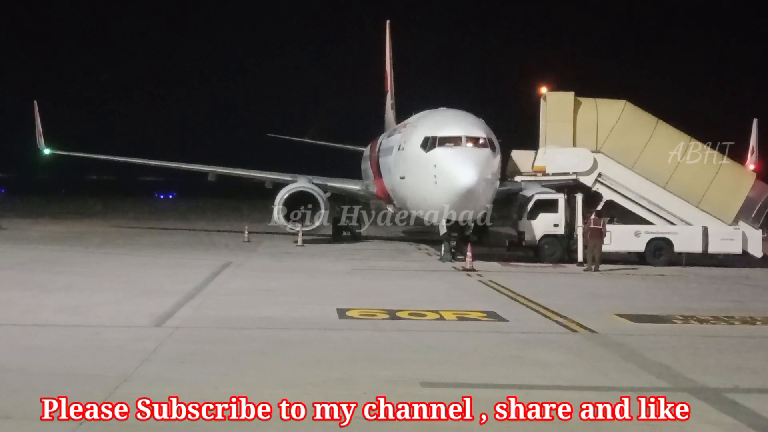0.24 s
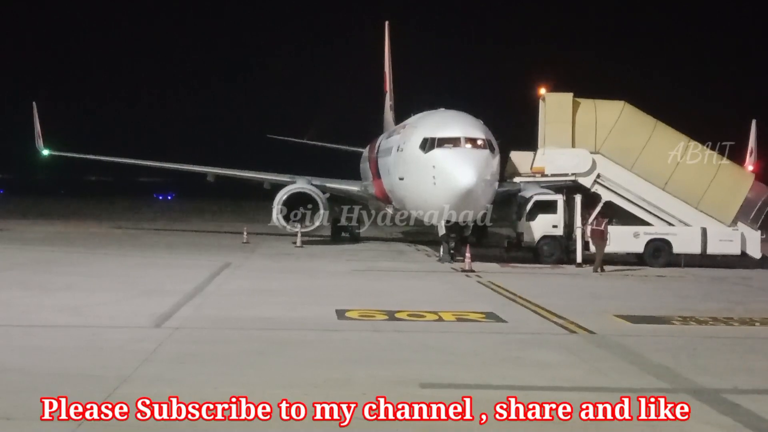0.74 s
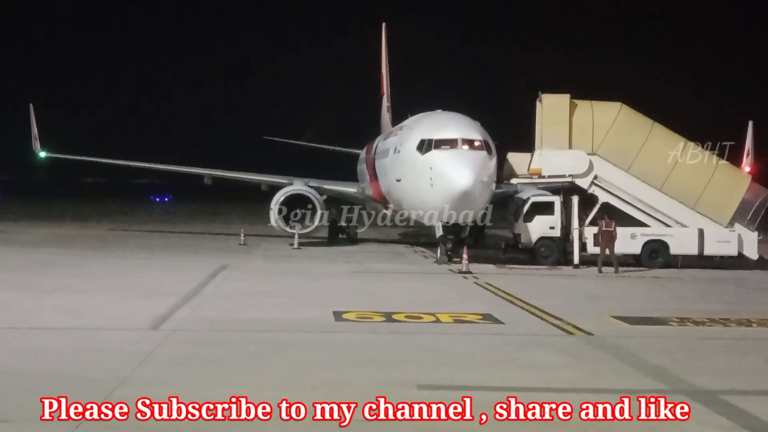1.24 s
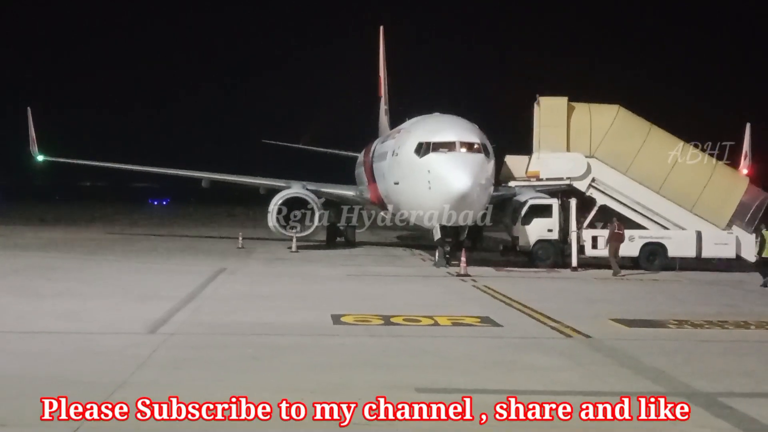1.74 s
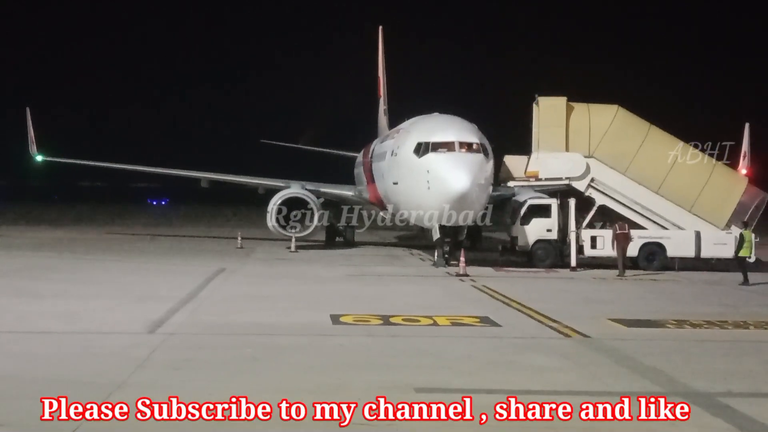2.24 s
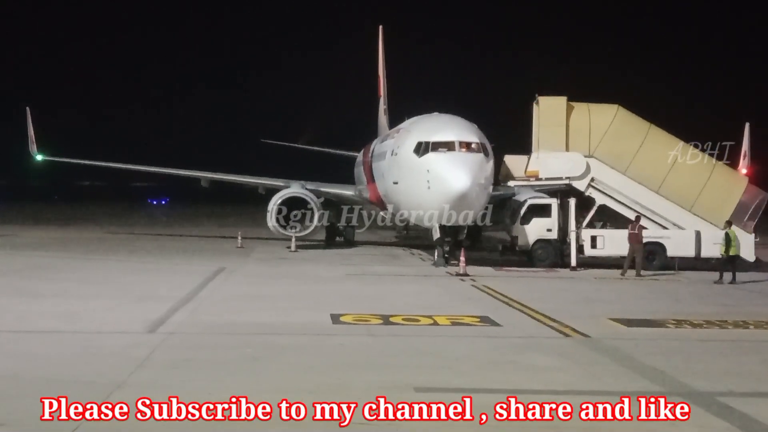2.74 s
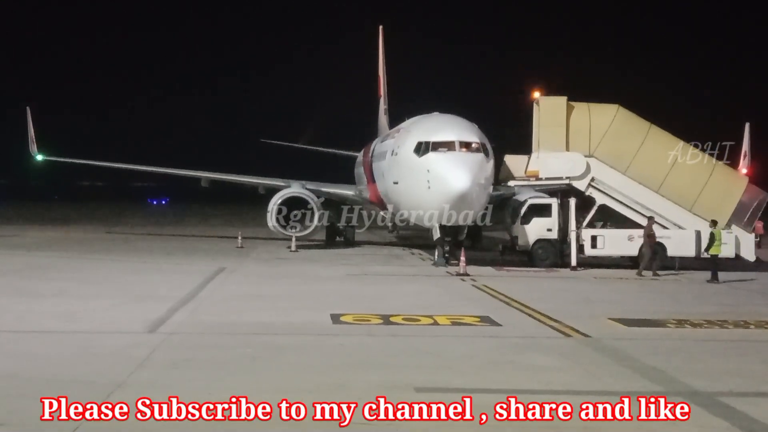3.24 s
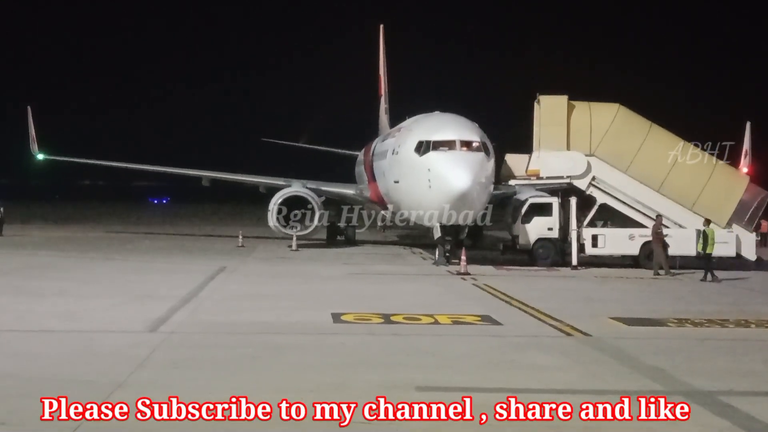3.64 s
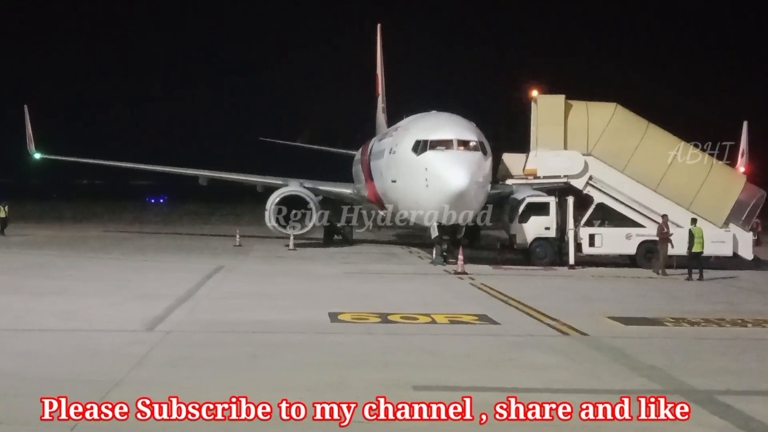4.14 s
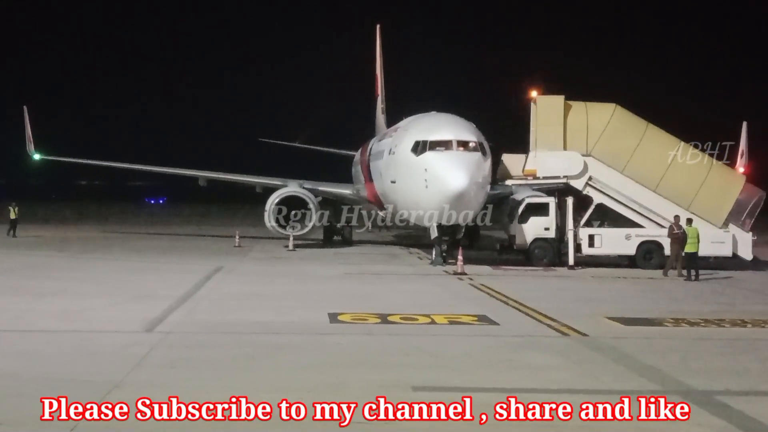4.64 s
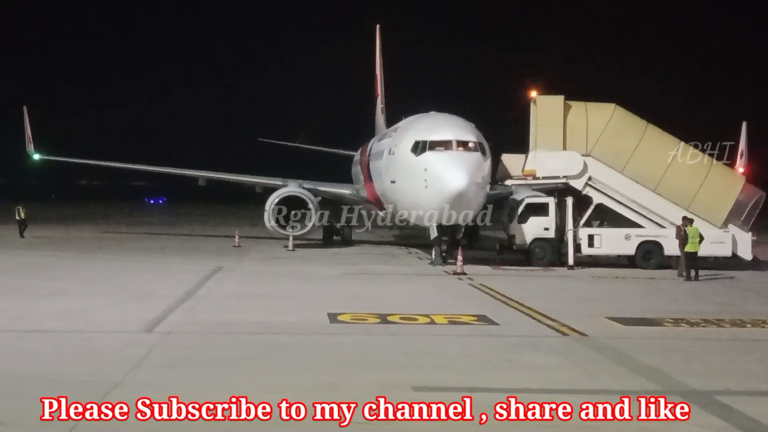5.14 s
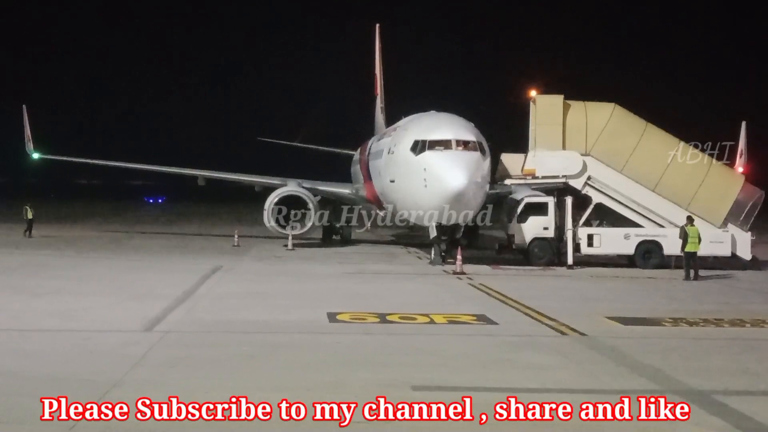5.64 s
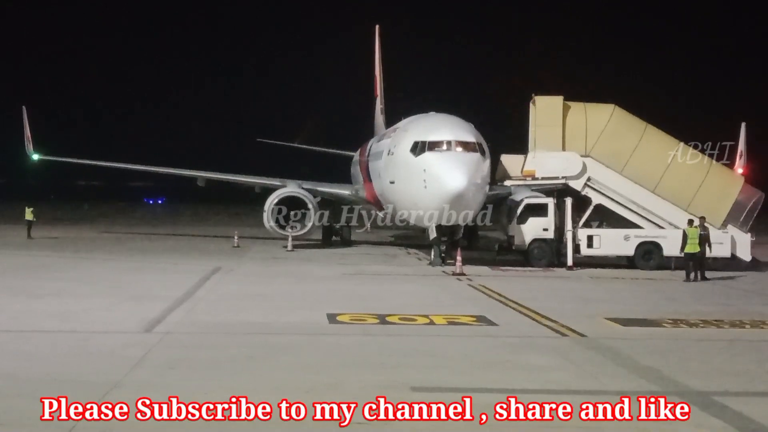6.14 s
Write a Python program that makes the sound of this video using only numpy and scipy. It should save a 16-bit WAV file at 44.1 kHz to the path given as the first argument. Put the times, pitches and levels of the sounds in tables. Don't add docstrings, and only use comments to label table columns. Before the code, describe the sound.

A parked airliner's auxiliary turbine hisses and roars steadily across an open night apron, with low fluttering rumble and a tiny metallic squeak at the end.

```python
import sys
import numpy as np
from scipy import signal
from scipy.fft import rfft, irfft, next_fast_len
from scipy.io import wavfile
from scipy.ndimage import uniform_filter1d, map_coordinates

SR = 44100
rng = np.random.default_rng(int(sys.argv[2]) if len(sys.argv) > 2 else 0)


def elevation(decibels):
    levels = np.asarray(decibels, float)
    return 10 ** (levels / 20)


def persist_wave(psi):
    counts = np.round(np.clip(psi, -1, 1) * 32767).astype(np.int16)
    wavfile.write(sys.argv[1], SR, np.atleast_2d(counts).T)


N = 282240

# (time [s], change [dB])
CARRY = [(0, 0), (.6, 0), (1.3, 0.64), (2.3, 0.44), (3.5, -1), (4.05, 0.26), (4.8, -0.1), (5.5, 0.1),
         (6.4, 0)]
# (middle [s], change [dB], length [s])
SURGES = [(.16, -4, 0.062), (.2, 2.5, .08), (1.07, 2.5, 0.13), (1.14, -8, 0.045), (1.29, 3, .05),
          (1.5, -6.5, 0.14), (1.66, 0, 0.064), (2.22, 2, 0.18), (2.32, -9, 0.082), (2.49, -6, 0.065),
          (2.98, 3, 0.11), (3.05, -4, 0.035), (3.53, -4, 0.086), (3.68, 3, 0.13), (4.04, 6, 0.074),
          (4.42, 5, .06), (4.465, -16, 0.032), (4.32, -5.5, 0.035), (4.6, 4.5, .04), (4.8, -10, 0.038),
          (5.12, -5, 0.037), (5.3, -6.5, .05), (5.97, 3, .06), (6.02, -14, 0.028), (6.07, 3, .04),
          (6.15, -7, 0.069), (6.24, 3, 0.071), (6.335, 5.5, 0.035), (6.365, -9, .02)]


def unit(x):
    return x / np.sqrt(np.mean(x ** 2) + 1e-20)


def curves(rows):
    s, *cols = np.transpose(rows)
    return [np.interp(np.arange(N) / SR, s, c) for c in cols]


def wobble(rate):
    knots = rng.standard_normal(int(N * rate / SR) + 4)
    return map_coordinates(knots, [np.arange(N) * rate / SR])


def bumps(rows, edge):
    t = np.arange(0, N + 64, 64) / SR
    total = sum(height * np.exp(-np.abs(2 * (t - s) / length) ** edge) for s, height, length in rows)
    return np.interp(np.arange(N) / SR, t, total)


def filtered(x, response):
    m = next_fast_len(N + SR // 10)
    return irfft(rfft(x, m) * response(np.fft.rfftfreq(m, 1 / SR)), m)[..., :N]


def rush(spectrum, patchy_db):
    z = signal.stft(rng.standard_normal(N + 1024), nperseg=1024)[2]
    field = uniform_filter1d(rng.standard_normal(z.shape), size=6, axis=0)
    field = uniform_filter1d(field, size=5, axis=1)
    noise = signal.istft(z * elevation(patchy_db * unit(field)), nperseg=1024)[1][:N]
    f, db = np.transpose(spectrum)
    return unit(filtered(noise, lambda hz: elevation(np.interp(np.log(hz + 1), np.log(f), db))))


def fuzzy(hz, width_hz):
    offset_hz = np.fft.fftfreq(N, 1 / SR)
    shape = 1 / (1 + (1.3 * offset_hz / width_hz) ** 2)
    white = rng.standard_normal(N) + 1j * rng.standard_normal(N)
    drift = np.fft.ifft(shape * white)
    return unit(np.real(drift * np.exp(2j * np.pi * np.cumsum(hz) / SR)))


def rings(events, t60, attack, overtone_db):
    out, t = np.zeros(N + SR), np.arange(SR // 5) / SR
    for s, db, hz in events:
        wave = np.sin(2 * np.pi * hz * t) + elevation(overtone_db) * np.sin(4 * np.pi * hz * t)
        envelope = elevation(db - 60 * t / t60) * (1 - np.exp(-t / attack))
        out[round(s * SR):][:len(t)] += envelope * wave
    return out[:N]


def squeak():
    # (time [s], level [dB], pitch [Hz])
    rubbing = [(6.1, -60, 2000), (6.2, -41, 1950), (6.26, -35.5, 1930), (6.325, -33.5, 1930),
               (6.343, -40, 2100), (6.365, -31, 2300), (6.377, -31, 2150), (6.388, -27, 2120),
               (6.4, -27, 2150)]
    # (time [s], peak [dB], ring pitch [Hz])
    slip_events = [(6.3195, -27, 1930), (6.358, -31, 2250), (6.3655, -25, 2400), (6.371, -23, 2300),
                   (6.3805, -19, 2100), (6.3875, -15.5, 2120), (6.392, -21, 2150), (6.396, -19, 2150)]
    # (frequency [Hz], density [dB per Hz])
    rasp_colour = [(1000, -60), (1450, -7), (1800, 1.5), (2400, -26), (2900, -10), (3500, -12), (4300, -9),
                   (6000, -15), (9000, -36)]
    db, hz = curves(rubbing)
    rasp_db = -3 + .6 * (db - db.max())
    band = elevation(-1.5) * fuzzy(hz, 130) + elevation(rasp_db) * rush(rasp_colour, patchy_db=.5)
    slips = elevation(3) * rings(slip_events, t60=.022, attack=.0006, overtone_db=-20)
    higher_mode = [(s, level, 2640) for s, level, _ in slip_events[-3:]]
    slips = slips + elevation(-7) * rings(higher_mode, t60=.03, attack=.0006, overtone_db=-20)
    return elevation(db) * band * (db > rubbing[0][1]) + slips


def gearbox():
    mesh_hz = [1150, 1220, 1485, 2299, 2415, 4517, 9043]
    # (level [dB], line width [Hz])
    mesh_lines = [(-54.5, 7), (-50.5, 8), (-56.5, 30), (-53.5, 11), (-61, 12), (-62.5, 14), (-57, 18)]
    total = np.zeros(N)
    for hz, (db, width_hz) in zip(mesh_hz, mesh_lines):
        total += elevation(db + 3 * wobble(3.3)) * fuzzy(np.full(N, float(hz)), width_hz)
    return total


def compressor():
    # (time [s], frequency [Hz])
    rotor = [(0, 14982), (1.3, 14984), (2.3, 14974), (2.7, 14955), (3.5, 14954), (4.1, 14925), (4.7, 14898),
             (5.25, 14888), (5.7, 14912), (6.0, 14932), (6.4, 14936)]
    # (middle [s], level [dB], length [s])
    openings = [(.15, -36.5, .2), (.36, -38, .09), (.59, -38, .15), (.85, -44.5, .3), (1.26, -36.5, .27),
                (1.62, -45.5, .3), (1.86, -43, .09), (2.06, -44, .09), (2.28, -38, .23), (2.71, -36.5, .22),
                (2.97, -38, .11), (3.13, -42, .12), (3.31, -44, .08), (3.49, -40, .15), (3.69, -44, .16),
                (3.99, -47, .22), (4.16, -44, .08), (4.49, -46, .08), (4.68, -43, .17), (5.02, -45.5, .11),
                (5.25, -42.5, .18), (5.47, -47, .12), (5.78, -47.5, .13), (5.99, -42, .1), (6.14, -43, .1),
                (6.34, -45, .2)]
    hump_orders = [.963, .9662, 1.0, 1.013]
    # (width [Hz], level [dB])
    haystack = [(260, -51), (30, -54.5), (300, -45.5), (350, -51)]
    hz, = curves(rotor)
    veiled_db, opening_loss_db = -55, 1.5
    heights = [(s, elevation(db - opening_loss_db), length) for s, db, length in openings]
    size = elevation(veiled_db) + bumps(heights, edge=2.4)
    phase = 2 * np.pi * np.cumsum(hz + 9 * wobble(35)) / SR
    tone = np.sqrt(2) * size * elevation(1.6 * wobble(30)) * np.sin(phase)
    humps = sum(elevation(db) * fuzzy(k * hz, width_hz) for k, (width_hz, db) in zip(hump_orders, haystack))
    return tone + humps * elevation(0.66 * wobble(8))


def puffs():
    # (time [s], peak [dB], centre [Hz])
    puff_events = [(.047, -26.5, 403), (.549, -38, 350), (2.649, -26.5, 417), (3.47, -27.5, 445),
                   (3.667, -28, 438), (4.008, -30.5, 300), (4.02, -31.5, 199), (4.142, -26.5, 330),
                   (4.35, -35.5, 139), (4.355, -29.5, 277), (4.66, -29.5, 470), (5.139, -34, 333),
                   (5.245, -28, 277), (5.95, -28, 235), (6.055, -26, 310)]
    return elevation(6.0) * rings(puff_events, t60=0.082, attack=0.0041, overtone_db=-25)


def gusts_db():
    # (time [s], peak [dB])
    gusts = [(0, -48), (.14, -48), (.38, -48.5), (.51, -47.5), (.62, -48.5), (.75, -46.5), (1.07, -46.5),
             (1.25, -47.5), (1.46, -46.5), (1.66, -46), (1.85, -48), (2.03, -50.5), (2.25, -50),
             (2.5, -47.5), (2.65, -52), (2.8, -46), (2.94, -46.5), (3.17, -52), (3.45, -49.5),
             (3.78, -48.5), (3.9, -47.5), (4.03, -50.5), (4.37, -45), (4.67, -46.5), (5.06, -53),
             (5.26, -52), (5.55, -53), (5.79, -47), (5.96, -51), (6.18, -51)]
    rise_db_per_s, fall_db_per_s, calm_db = 105, 108, -56
    t = np.arange(0, N + 64, 64) / SR
    s, peak_db = np.transpose(gusts)[:, :, None]
    level_db = peak_db - np.where(t < s, rise_db_per_s, fall_db_per_s) * np.abs(t - s)
    return np.interp(np.arange(N) / SR, t, np.maximum(level_db.max(axis=0), calm_db))


def exhaust_buffet(lumps):
    # (frequency [Hz], density [dB per Hz])
    thud_colour = [(15, -30), (25, -29), (60, -14.5), (90, -8), (115, 4.5), (150, -1), (200, 0), (260, 2.5),
                   (400, -58)]
    thud = rush(thud_colour, patchy_db=1.0) + elevation(-10) * fuzzy(np.full(N, 115.), 27)
    return elevation(gusts_db() + 3.0) * unit(elevation(0.35 * lumps) * thud)


def exhaust_rumble(lumps):
    # (frequency [Hz], density [dB per Hz])
    exhaust_colour = [(100, -80), (170, -23), (220, -13), (300, 2), (350, -2.5), (400, 0), (480, 0.5),
                      (560, -12), (640, -24.5), (760, -66), (1200, -120)]
    carry_db, = curves(CARRY)
    level_db = -38 + 0.72 * carry_db + bumps(SURGES, edge=2.1)
    return elevation(level_db) * unit(elevation(0.5 * lumps) * rush(exhaust_colour, patchy_db=2.0))


def duct_roar():
    # (frequency [Hz], density [dB per Hz])
    duct_colour = [(300, -120), (560, -41), (700, -0.5), (950, 3.5), (1230, 3), (1340, -6), (1480, 1.5),
                   (1750, 0.5), (2300, 2.5), (2800, 0), (3200, -5), (3700, -8), (4200, -19), (6000, -120)]
    carry_db, = curves(CARRY)
    level_db = -37 + carry_db + 0.061 * bumps(SURGES, edge=2.1)
    comb = lambda hz: 1 - 0.084 * np.exp(-2j * np.pi * hz / 685)
    duct = unit(filtered(rush(duct_colour, patchy_db=1.9), comb))
    return elevation(level_db + 0.56) * duct


def inlet_hiss():
    # (frequency [Hz], density [dB per Hz])
    inlet_colour = [(2000, -16.5), (3400, -7), (3970, -10), (4590, -3.5), (5200, -4), (5600, -5.5),
                    (6800, -2.5), (8150, -1), (8600, 4.5), (11000, 2.5), (12000, -2), (13500, -8.5),
                    (14200, -1.5), (15600, -18)]
    # (middle [s], change [dB], length [s])
    last_gasp = (6.4, 3, 0.056)
    carry_db, = curves(CARRY)
    level_db = -34 + .25 * carry_db + bumps([last_gasp], edge=2)
    return elevation(level_db + 0.12 * wobble(10)) * rush(inlet_colour, patchy_db=1.1)


def edge_ripples(x):
    # (centre [Hz], width [Hz], change [dB])
    ripple_bands = [(760, 30, 3), (950, 50, 2), (1030, 30, -3), (1550, 50, -3), (1740, 70, 2),
                    (2060, 110, -2.5), (3300, 90, -2.5), (4350, 90, -2.5), (5250, 90, 2.5), (5850, 80, 2.5),
                    (6300, 90, -2.5), (6800, 120, 2.5), (7150, 130, -2.5), (7550, 150, 2.5), (8950, 80, -2),
                    (9700, 130, -4), (10050, 100, 1.5), (10400, 120, -1.5), (12700, 150, -1.5)]
    response = lambda hz: elevation(sum(db * np.exp(-((hz - c) / w) ** 2) for c, w, db in ripple_bands))
    return filtered(x, response)


def scene():
    lumps = wobble(14)
    flow = exhaust_buffet(lumps) + exhaust_rumble(lumps) + edge_ripples(duct_roar() + inlet_hiss())
    mono = squeak() + gearbox() + compressor() + puffs() + flow
    return np.array([mono, mono])


def suppressor(x, depth, reach_hz):
    hz, _, z = signal.stft(x, SR, nperseg=1024)
    hz = hz[:, None]
    power = uniform_filter1d(np.abs(z) ** 2, size=5, axis=0)
    power = uniform_filter1d(power, size=3, axis=1) + 1e-16
    usual = uniform_filter1d(np.mean(power, axis=1, keepdims=True), size=9, axis=0)
    strength = depth / (1 + (hz / reach_hz) ** 4) * np.where(hz > 700, 1, .3)
    gain = np.minimum(power / (.6 * usual), 1) ** strength
    return signal.istft(z * gain, SR, nperseg=1024)[1][:N]


def side_noise():
    # (middle [s], low edge [Hz], high edge [Hz])
    lump_bands = [(1.993, 6900, 9800), (2.202, 5700, 7600), (2.597, 5100, 8400), (2.759, 6900, 8400),
                  (3.2, 4600, 7000), (3.2, 9600, 11100), (3.386, 7600, 9000), (3.386, 9600, 11100),
                  (3.665, 11700, 13200), (4.663, 11000, 12500), (4.919, 11000, 12500), (4.988, 4600, 5800),
                  (4.988, 8300, 9800), (5.105, 5700, 8400), (5.267, 5100, 6400), (5.267, 10300, 11800),
                  (5.383, 6300, 7700)]
    lump_db = [-40, -43, -42, -42, -40, -41, -44, -42, -49, -43, -45, -48, -38, -41, -49, -42, -47]
    side, block = np.zeros(N), 1400
    hz = np.fft.rfftfreq(block, 1 / SR)
    for (s, low_hz, high_hz), db in zip(lump_bands, lump_db):
        spectrum = rfft(rng.standard_normal(block)) * (hz > low_hz) * (hz < high_hz)
        band = unit(irfft(spectrum, block))
        side[round(s * SR) - block // 2:][:block] += elevation(db) * band * np.hanning(block)
    return np.array([side, -side])


def low_pass(x):
    return signal.sosfilt(signal.butter(12, 16760, fs=SR, output="sos"), x)


def record(dry):
    quiet = suppressor(dry[0], depth=1.1, reach_hz=5500)
    mono = filtered(quiet, lambda hz: hz < 15510)
    return low_pass(mono + side_noise())


dry = scene()
out = record(dry)
persist_wave(out)
```